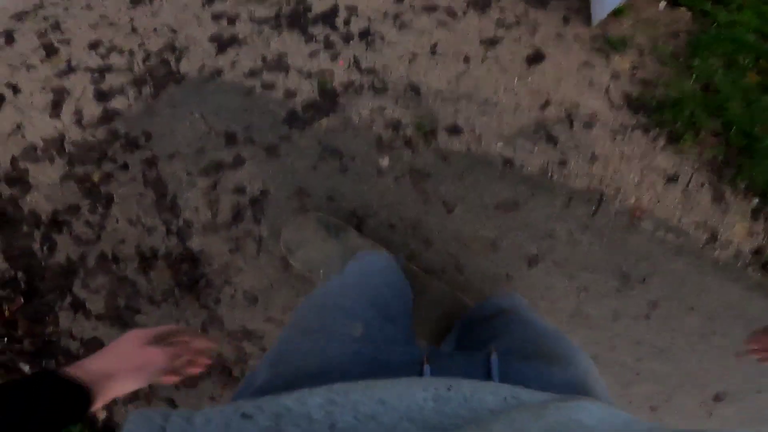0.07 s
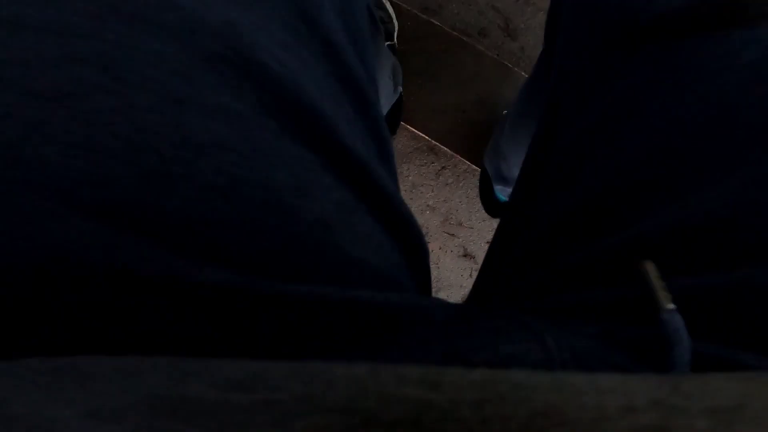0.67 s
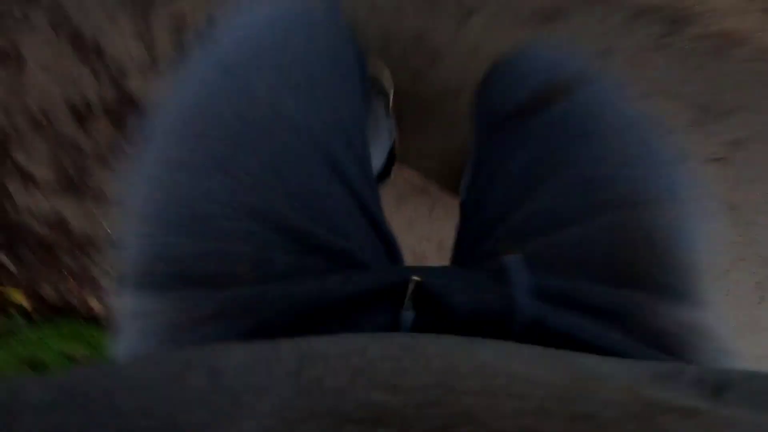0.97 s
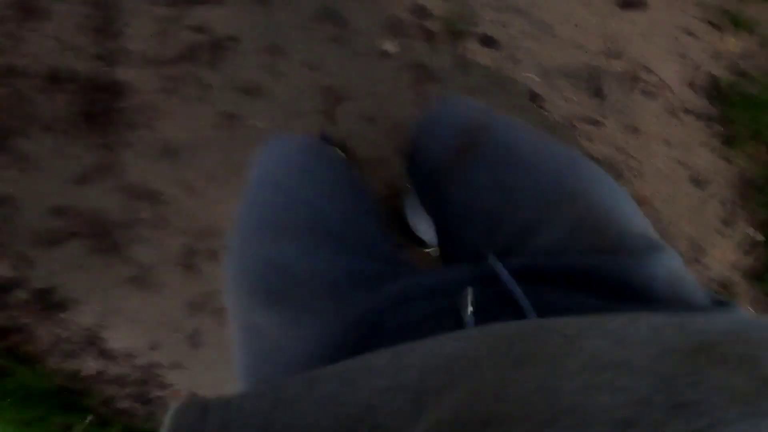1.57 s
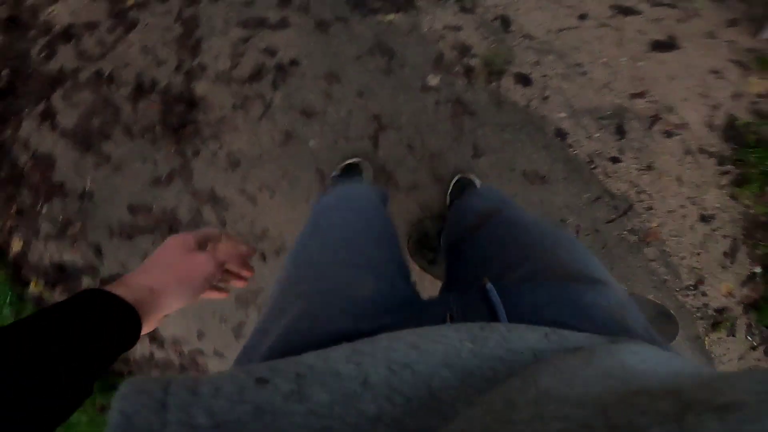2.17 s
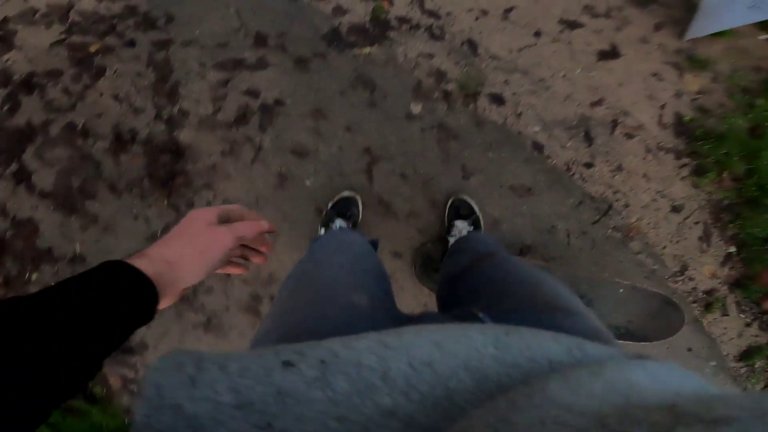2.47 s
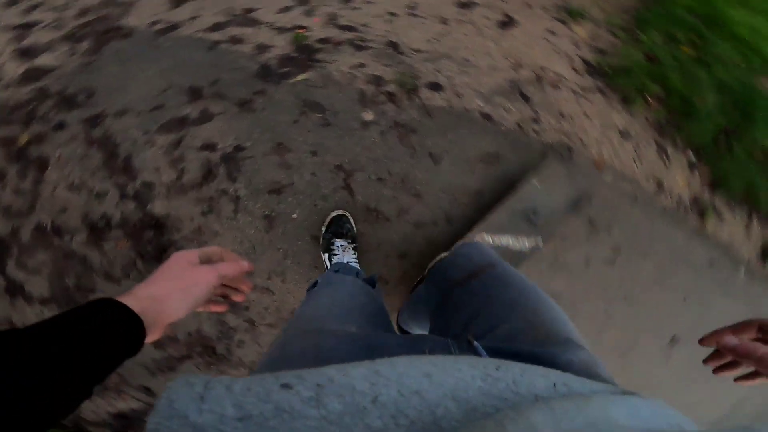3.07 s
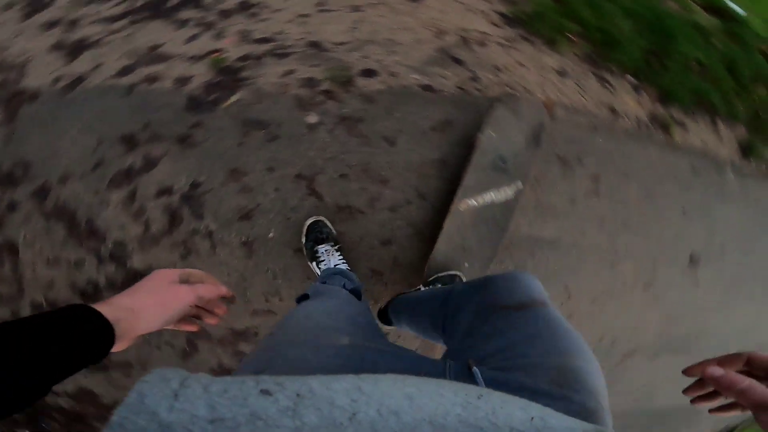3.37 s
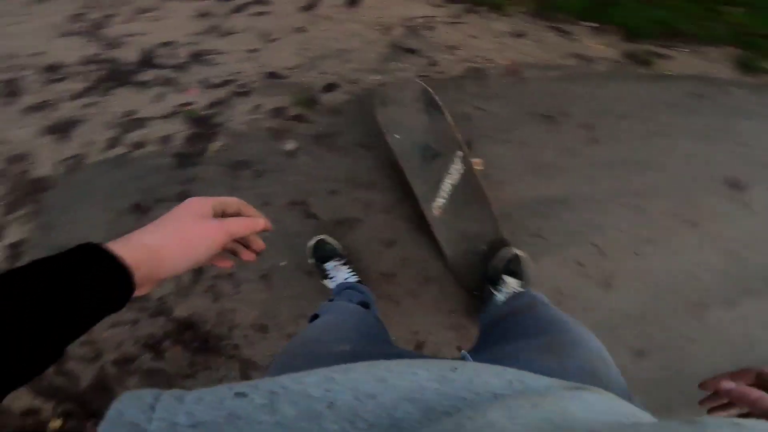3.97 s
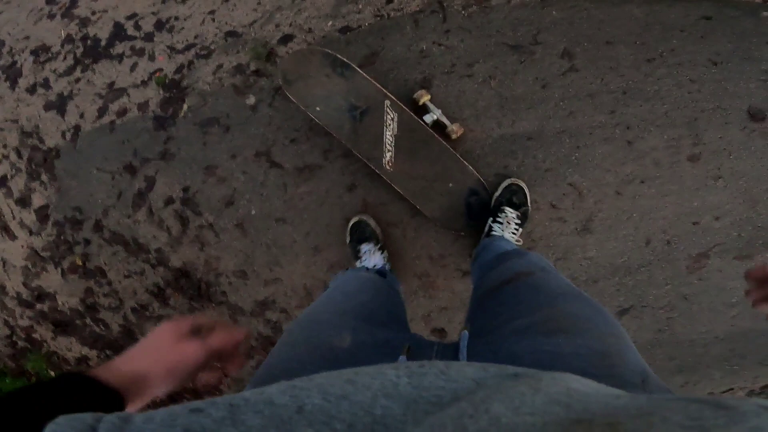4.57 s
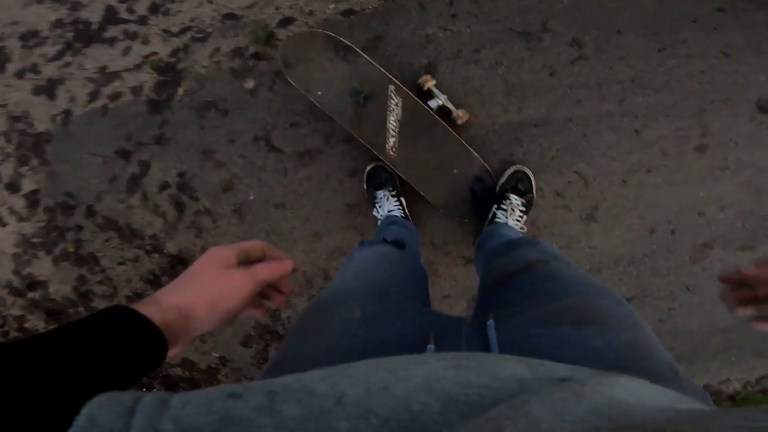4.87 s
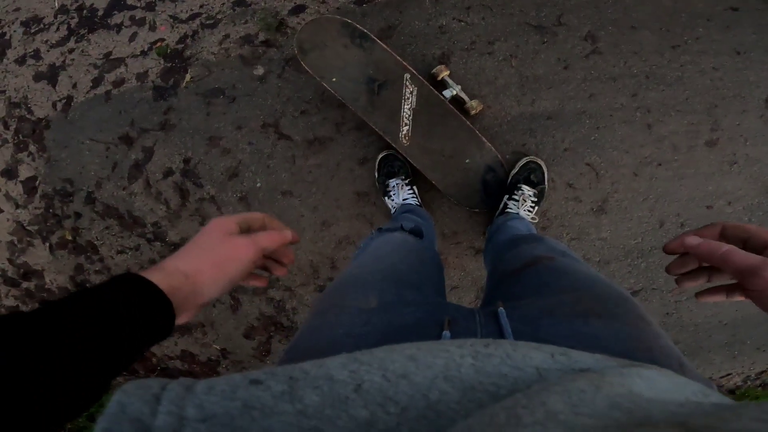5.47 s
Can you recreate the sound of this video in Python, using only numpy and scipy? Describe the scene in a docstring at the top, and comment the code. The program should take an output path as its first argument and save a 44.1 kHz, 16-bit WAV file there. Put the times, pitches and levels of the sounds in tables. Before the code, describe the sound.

Low wind rumbles on a chest-worn microphone throughout, over faint distant traffic and a light hiss. In the first second, soles scuff softly and grit snaps on a concrete path, while stronger gusts swell from about 0.5 to 0.9 seconds. At 1.2 seconds a skateboard's tail pops and a shoe drags over the grip tape. The board lands in a close wooden clatter, loudest around 1.5 seconds and dying away by 1.8. The wheels whirr softly from about 2.2 to 2.6 seconds, rising slightly in pitch. From 2.8 seconds a foot flips the board and shoves it around, making an uneven run of ringing wooden knocks, gritty scrapes and rattling trucks. This gets busier from 3.6 seconds and ends near 4.4. One faint scuff follows at about 4.8 seconds, then only wind and far traffic remain until 5.5 seconds.

```python
"""A concrete path outdoors, the microphone on a skateboarder's chest, the board at their feet.
Wind rumbles on the microphone throughout, over far traffic and faint microphone hiss. Soles scuff and
grit snaps; at 1.2 s the tail pops, a shoe drags over the grip tape, and the board lands and clatters,
its maple deck ringing. The wheels whirr briefly as it rolls. From 2.8 s a foot flips the board and
shoves it round, knocking and scraping, the trucks now free to rattle."""
import sys
import numpy as np
from scipy import signal
from scipy.fft import rfft, irfft
from scipy.io import wavfile
from scipy.ndimage import uniform_filter1d

SR = 44100
rng = np.random.default_rng(int(sys.argv[2]) if len(sys.argv) > 2 else 0)


def transcribe(u):
    """Save the signal u as a 16-bit wav file named by the first command-line argument.

    u: samples, shape (n,) or (channels, n), limited to [-1, 1]; the rate is SR.
    q: integer samples, one column per channel.
    """
    v = np.clip(np.atleast_2d(u).T, -1, 1)
    q = np.round(v * 32767).astype(np.int16)
    wavfile.write(sys.argv[1], SR, q)


N = 243152

# breeze on the microphone (time [s], level [dB])
BREEZE_LEVEL = [(0, -29), (.35, -28.5), (.9, -26.5), (1.15, -33.5), (1.6, -29.5), (2.15, -35), (2.95, -31),
                (3.45, -31), (3.8, -29), (4.1, -28), (4.4, -31.5), (4.7, -30.5), (5.5, -27.5)]
# its rumble (frequency [Hz], gain [dB])
BREEZE_COLOUR = [(12, -18.5), (25, 1.5), (40, 2), (75, 2), (120, 0.5), (190, -9.5), (260, -11),
                 (400, -20.5), (900, -67.5), (5000, -100)]
# rushes of air as the rider crouches and lands (middle [s], length [s], level [dB])
GUSTS = [(0.527, 0.16, -16.5), (0.765, 0.094, -19), (0.842, 0.08, -20.5), (1.59, 0.096, -25.5),
         (4.492, 0.05, -24.5), (4.739, 0.076, -35)]
# their deeper rumble (frequency [Hz], gain [dB])
GUST_COLOUR = [(12, -18), (25, 2), (45, 1.5), (75, 8), (120, -5), (190, -10.5), (300, -20), (500, -34),
               (900, -68), (5000, -100)]
# a far road (time [s], wash level [dB], tyre roar level [dB], roar centre [Hz])
TRAFFIC = [(0, -38, -56, 895), (.5, -40, -40, 954), (0.85, -39, -53, 991), (1.08, -34, -40.5, 1039),
           (1.6, -33, -54, 985), (1.951, -42.5, -48, 850), (2.36, -38, -44, 955), (2.58, -37, -47, 929),
           (3.101, -36, -37, 949), (4.698, -35, -42, 935.6), (5.5, -31.5, -35.5, 911.5)]
# its broad wash (frequency [Hz], gain [dB])
TRAFFIC_COLOUR = [(100, -4), (200, 2.5), (330, -10.5), (550, -0.5), (800, -0.5), (1000, -0.5), (1350, -6.5),
                  (2000, -13), (3000, -31), (4600, -63), (6000, -49.5), (15000, -80)]
# faint, steady microphone hiss (time [s], level [dB])
HISS_LEVEL = [(0, -54.5), (1.1, -50), (1.9, -52), (2.6, -49), (4.4, -52.5), (5.5, -52)]
# its spectrum (frequency [Hz], gain [dB])
HISS_COLOUR = [(1000, -1.5), (2400, 2), (3200, -1), (4700, -9.5), (5300, -23.5), (10000, -29.5),
               (12000, -41.5), (15000, -50.5)]
# slides and rolls of sole and board (start [s], end [s], pressure [dB], grittiness [dB])
SLIDES = [(0.005, 1.1, -46.5, 12), (0.186, 0.343, -41.5, 12.5), (0.407, 0.43, -29, 3),
          (0.446, 0.56, -58, 25.5), (0.589, 0.629, -38, 8), (0.778, 0.87, -36.5, 2),
          (1.086, 1.18, -43, 12.5), (1.158, 1.24, -31.5, 12), (1.231, 1.31, -25.5, 9),
          (1.334, 1.36, -27, 5.5), (1.382, 1.513, -26.5, 4.5), (1.553, 1.75, -41.5, 11),
          (2.583, 2.805, -58, 19), (2.786, 2.869, -32, 3.5), (2.862, 2.957, -35, 8), (2.96, 3.064, -50, 13),
          (3.164, 3.225, -24.5, -2), (3.25, 3.32, -30, -1.5), (3.35, 3.412, -32.5, -6),
          (3.425, 3.492, -31.5, 1.5), (3.61, 3.744, -24, 2.5), (3.781, 3.838, -26, 0),
          (3.886, 3.93, -26, -6), (3.929, 3.982, -20.5, -5.5), (4.015, 4.113, -24, -3),
          (4.14, 4.223, -22, -2.5), (4.251, 4.404, -37, 6.5), (4.752, 4.795, -30.5, -12)]
# ringing of the maple deck and its trucks (frequency [Hz], level [dB], t60 [s])
DECK_MODES = [(450, -17.5, 0.065), (498.3, 6, 0.044), (574, 7, 0.093), (615.4, 5.5, 0.26),
              (680.2, 5.5, 0.1), (770.4, 3.5, 0.13), (849.4, 4.5, 0.074), (1482, 0.5, 0.057),
              (1800, -1, 0.071)]
# higher wood and truck resonances that sing and rattle (frequency [Hz], level [dB], t60 [s])
RATTLE_MODES = [(1389, 11, 0.029), (1660, 9.5, 0.021), (1654, 4, 0.044), (1811, 1.5, 0.053),
                (2170, -14.5, 0.018), (2296, -11, 0.075), (3170, -18, 0.022), (4060, -5, 0.0059),
                (4220, -10, 0.023)]
# how freely those sing; the feet mute them until the board is loose (time [s], gain [dB])
RATTLE_FREEDOM = [(1.5, -25), (2.8, 8), (4.2, 3.5)]
# the deck flexing in a slide (frequency [Hz], gain [dB])
FLEX_COLOUR = [(130, -22.5), (220, -12), (290, -4), (400, 3), (500, -10), (900, -38.5), (6000, -70)]
# wood rasping on concrete (frequency [Hz], gain [dB])
RASP_COLOUR = [(500, -60.5), (1100, 9.5), (1450, 2), (1900, 0), (2500, 2), (3100, -8), (4300, -20),
               (5300, -36), (9000, -45), (15000, -46.5)]
# crushed grit (frequency [Hz], gain [dB])
GRIT_COLOUR = [(1500, -16), (3000, 13.5), (4500, 13), (5400, 2), (7500, -1.5), (10000, -3), (12500, -12.5),
               (15000, -14.5)]
# soles, wheels and the deck's edge catching as they twist
# (time [s], length [s], level [dB], first pitch [Hz], last pitch [Hz], bandwidth [Hz])
SCUFFS = [(0.203, 0.0059, -37.5, 4270, 4050, 450), (0.206, 0.052, -45, 3410, 3650, 1600),
          (0.214, 0.011, -39, 2890, 3100, 350), (1.104, 0.072, -46.5, 3480, 3530, 900),
          (1.285, 0.019, -30, 1664, 1640, 120), (1.701, 0.0076, -19, 1190, 1305, 250),
          (3.655, 0.049, -39.5, 4200, 4150, 700), (3.949, 0.023, -42, 1486, 1480, 253),
          (4.014, 0.0397, -29, 1550, 1440, 220), (4.037, 0.067, -50, 4250, 4150, 500),
          (4.069, 0.043, -37, 1434, 1540, 220), (4.205, 0.04, -29.5, 1425, 1415, 200),
          (4.26, 0.017, -37, 3520, 3480, 900)]
# the largest grains snapping under wood or sole (time [s], level [dB], centre [Hz], t60 [s])
GRIT_TICKS = [(0.2615, -48, 11900, .045), (0.3055, -34.5, 3800, 0.027), (0.505, -38, 5450, 0.028),
              (0.799, -42.5, 5400, .035), (1.1775, -46, 6000, .03), (1.266, -41, 9000, 0.11),
              (1.3132, -28, 7500, .009), (1.3452, -35, 8500, 0.02), (1.3906, -38, 10500, .07),
              (1.432, -42, 9000, .04), (1.444, -39, 7500, .045), (1.4717, -37, 7000, 0.073),
              (1.6165, -46, 7500, 0.014), (1.648, -43, 7500, .035), (1.698, -50, 9000, .03),
              (1.772, -47, 7400, .015), (3.1741, -37, 6560, 0.052), (3.2608, -43, 5400, .035),
              (3.357, -54, 10000, .06), (3.452, -48, 7500, 0.054), (3.622, -36, 5400, .02),
              (3.644, -41, 7500, .04), (3.674, -42, 7540, .045), (3.7365, -46, 7500, 0.023),
              (4.0225, -36, 4500, 0.028), (4.157, -44, 5400, .04), (4.2046, -42, 7000, .03),
              (4.3435, -40, 7500, 0.05), (4.3648, -37.5, 7540, 0.052), (4.3885, -35, 4200, 0.045),
              (4.859, -40, 4200, .025)]
# blows on the board (time [s], strength [dB], weight [0 bare tap to 1 full stamp], crack [dB],
# bending pitch [Hz], ring centre [Hz], crack centre [Hz], clack [dB], t60 under sole or ground [s])
KNOCKS = [(0.423, -22.5, 0.098, -12, 323, 720, 1500, -2, 0.23),
          (1.1905, -10, 0.16, -11, 263, 715, 2000, 0, 0.39), (1.228, -20, .17, -7, 346, 710, 2600, 3, .1),
          (1.2439, -8, .53, -14, 313, 670, 2000, 1, .35),
          (1.252, -15.5, 0.27, -12.5, 347, 734, 3770, -4.5, .3),
          (1.26, -13.5, 0.56, -8, 334, 654, 3500, 9, .3), (1.268, -14, 0.86, -1, 293, 704, 3800, 3, .3),
          (1.298, -15, 0.36, -1, 252, 686, 1700, 8, 0.22), (1.337, -27, .1, -2, 330, 620, 1700, 0, .1),
          (1.383, -22.5, 0.12, -7, 330, 760, 2100, -2, 0.17),
          (1.401, -17.5, 0.83, -10, 303, 650, 2000, 3, .15),
          (1.422, -15, 0.64, -16, 308, 650, 2000, 3, .15), (1.433, -25, .1, -8, 330, 620, 1500, 1, .1),
          (1.4453, -23, .1, -6, 330, 620, 1400, 1, .15), (1.47, -15, 0.15, -11, 336, 680, 2480, -3, 0.14),
          (1.4838, -1.5, 0.26, -12.5, 295, 674, 2700, 4.5, 0.089),
          (1.4915, -6.5, 0.14, -12, 254, 600, 2340, -9, .3),
          (1.507, -12.5, .11, -30, 300, 700, 2980, 0, 0.092),
          (1.5145, -3.5, 0.42, -14, 255, 530, 1500, 11.5, 0.053),
          (1.532, -11.5, 0.39, -5, 306, 682, 2570, 9.5, 0.078),
          (1.542, -31, 0.34, -8, 313, 623, 1810, 1, 0.11), (1.565, -21, 0.56, 1, 300, 600, 1680, 0, .1),
          (1.5865, -13, 0.085, -16, 385, 740, 1720, 8.5, 0.068),
          (1.593, -11.5, 0.78, -27, 315, 600, 1500, 1, 0.085), (1.612, -31, .13, 1, 320, 960, 2430, 7, .08),
          (1.6392, -9, 0.46, -23, 308, 790, 1500, 5, 0.25),
          (1.6485, -22.5, 0.64, -18, 328, 780, 1700, 0, .2),
          (1.6745, -14, 0.44, -9.5, 353, 760, 2200, 3, .44),
          (1.705, -20.5, 0.38, 1, 308, 740, 2100, -7, 0.36),
          (1.743, -23.5, 0.092, -5, 313, 800, 1700, 1, 0.41),
          (1.79, -26.5, 0.4, -3, 282, 780, 1780, 9, 0.36),
          (2.7627, -11.5, 0.49, -14, 424, 740, 1600, 5.5, .12),
          (2.775, -14, 0.38, -17, 290, 560, 1510, -4, 0.14),
          (2.781, -18.5, .32, -15, 340, 705, 1712, 1, 0.13), (2.809, -12.5, .4, -20, 275, 560, 1700, 3, .2),
          (2.819, -14.5, 0.2, -17, 275, 800, 1650, -4, 0.33),
          (2.8728, -15.5, .14, -13, 410, 770, 1630, 1, .4),
          (2.889, -16.5, .25, -5, 382, 800, 1690, -1, 0.36),
          (2.912, -19.5, .11, -12, 387, 669, 1430, -1, .3),
          (2.9515, -18.5, 0.12, -10, 367, 830, 1300, -6, 0.26),
          (3.174, -13, 0.085, -15.5, 348.6, 620, 2200, 2, 0.47),
          (3.187, -15.5, .1, -13, 401, 613, 1500, -3, .35), (3.2598, -14, .08, -13, 379, 610, 2980, 0, 0.5),
          (3.366, -27, .1, -26, 380, 620, 3000, -1, 0.99), (3.441, -19, 0.22, -15, 396, 624, 3007, -1, .15),
          (3.4485, -12.5, 0.23, -10.5, 412, 755, 3250, 0, 0.3),
          (3.605, -16.5, .2, -8, 440, 718, 1400, 9.5, 0.065),
          (3.614, -16, 0.26, -7, 374, 620, 2870, 0, 0.15),
          (3.621, -20.5, .22, -11, 380, 644, 3870, 1, 0.11), (3.637, -22, .09, -1, 382, 600, 1720, 1, .08),
          (3.646, -12.5, 0.2, -10, 298, 624, 2340, 4, .1),
          (3.658, -10.5, 0.35, -6, 370, 600, 1700, 0, 0.19),
          (3.6764, -15.5, .036, -5, 367, 640, 2770, 1, .15),
          (3.6985, -14.5, 0.17, -3.5, 317, 595, 2000, 3, 0.16),
          (3.706, -17.5, .06, -12, 340, 610, 1700, 3, .4), (3.724, -22, 0.052, 4, 345.6, 645, 2140, 3, .15),
          (3.736, -23, .083, 2, 360, 604, 1900, 2, .15),
          (3.801, -19, 0.17, -15.5, 368, 620, 2400, -7, 0.33),
          (3.837, -29.5, .1, -0.5, 360, 620, 2280, 0, 0.13),
          (3.93, -14, 0.35, -13, 420, 593, 2560, 2.5, 0.082),
          (3.9545, -18.5, .11, -6, 382, 593, 3200, 2, .06),
          (3.9677, -11.5, 0.24, -22, 290, 560, 1500, 7, .04),
          (4.009, -15, .093, -14, 350, 600, 3280, 4, .05),
          (4.0225, -11, 0.25, -16, 356, 560, 1500, -5, 0.036),
          (4.054, -11, .28, -27, 338, 565, 1500, 10.5, 0.049),
          (4.075, -19.5, 0.097, -13, 358, 578, 1550, 7, 0.091), (4.092, -25, .1, -6, 360, 950, 1400, 3, .1),
          (4.113, -20, .1, -12, 360, 587, 2440, 5, .2), (4.159, -13.5, 0.29, -25, 338, 600, 2000, -7, 0.26),
          (4.178, -15.5, 0.12, -22, 406.3, 765, 1710, 3, .2),
          (4.184, -11, 0.1, -19, 446, 583, 2001, 2, 0.14), (4.2028, -9, .1, -18, 322.7, 616, 3070, 1, 0.16),
          (4.224, -16.5, .13, -21, 374, 620, 1450, -2, .3),
          (4.2665, -14.5, 0.22, -11.5, 379, 615, 3430, 2, .2),
          (4.282, -19, 0.047, -15, 405, 610, 3600, 2, .15), (4.34, -20, .22, -11, 338, 623, 3430, -8, 0.34),
          (4.365, -22, .1, -7, 363, 620, 3600, 4, .3)]
# wood cracking on concrete (frequency [Hz], gain [dB])
CRACK_COLOUR = [(600, -28.5), (1100, 9.5), (1600, 11.5), (2000, 7), (2500, 1), (3200, -1.5), (4400, -3),
                (5300, -28.5), (9000, -14.5), (15000, -36.5)]
# what the deck gives to the air: little bass from so small a board, little treble from so soft
# a contact (frequency [Hz], gain [dB])
DECK_RADIATION = [(60, -36.5), (150, -7), (250, 0.5), (900, 2), (2000, -12.5), (4200, -18), (5500, -38),
                  (15000, -49)]
# wheels of the rolling board (time [s], level [dB], pitch [Hz])
WHEEL_WHIRR = [(2.05, -70, 900), (2.22, -42.5, 930), (2.35, -36.5, 950), (2.44, -39, 1070),
               (2.5, -50, 1150), (2.555, -37, 1190), (2.63, -69, 1200)]
# scatter from ground and nearby walls (frequency [Hz], gain [dB])
SCATTER_COLOUR = [(200, 1.5), (1500, 1.5), (5000, -3.5), (12000, -10.5)]


def undb(db):
    """Decibels to gain."""
    return 10 ** (np.asarray(db) / 20)


def unit(x):
    """Scale to rms 1."""
    return x / np.sqrt(np.mean(x ** 2) + 1e-18)


def even(x, seconds):
    """Hold a noise near rms 1 over spans longer than this."""
    return x / np.sqrt(uniform_filter1d(x ** 2, int(seconds * SR)) + 1e-12)


def curves(rows):
    """Join timed rows by straight lines: one curve for each column after the time."""
    times, *columns = np.transpose(rows)
    return np.squeeze([np.interp(np.arange(N) / SR, times, column) for column in columns])


def add(track, time, sound):
    """Mix a sound into a track at a time in seconds."""
    start = int(time * SR)
    track[start:start + len(sound)] += sound[:N - start]


def fade(t, t60):
    """Exponential decay, 60 dB down after t60."""
    return np.exp(-np.log(1000) * t / t60)


def colour(x, points, size=8192):
    """Causal filter through (frequency [Hz], gain [dB]) points, built from its cepstrum."""
    hz, db = np.transpose(points)
    grid = np.maximum(np.arange(size // 2 + 1) * SR / size, 1)
    cepstrum = irfft(np.log(undb(np.interp(np.log(grid), np.log(hz), db))))
    cepstrum[1:size // 2] *= 2
    cepstrum[size // 2 + 1:] = 0
    impulse = irfft(np.exp(rfft(cepstrum)))[:size // 2]
    return signal.fftconvolve(x, impulse)[:len(x)]


def noise(points, samples=N):
    """Noise of a given colour."""
    return colour(rng.standard_normal(samples), points)


def favour(table, hz, db_per_octave):
    """A gain in dB for each row of a table, falling away on both sides of one pitch."""
    return -db_per_octave * np.abs(np.log2(np.transpose(table)[0] / hz))


def focused_noise(points, centre_hz, samples, db_per_octave):
    """Coloured noise at rms 1, weighted towards one pitch."""
    hz, db = np.transpose(points)
    return unit(noise(np.column_stack([hz, db + favour(points, centre_hz, db_per_octave)]), samples))


def narrow_noise(hz, width_hz):
    """Noise in a narrow band around a moving centre."""
    lowpass = signal.butter(3, width_hz / 2, fs=SR, output="sos")
    slow = signal.sosfilt(lowpass, rng.standard_normal((2, len(hz) + SR // 20)))[:, -len(hz):]
    phase = 2 * np.pi * np.cumsum(hz) / SR
    return unit(slow[0] * np.cos(phase) + slow[1] * np.sin(phase))


def wander(per_s):
    """Smooth random drift at rms 1."""
    hold = int(SR / per_s)
    steps = rng.standard_normal(N // 100)[np.arange(N) // hold]
    return unit(uniform_filter1d(uniform_filter1d(steps, hold), hold))


def grains(per_s, spread_db):
    """Random clicks, a few much larger than the rest."""
    sizes = undb(spread_db * np.minimum(rng.exponential(size=N), 4))
    return unit((rng.random(N) < per_s / SR) * rng.choice([-1, 1], N) * sizes)


def mode_rings(modes, t, detune=1):
    """Each mode as a fading sine, one row a mode."""
    hz, db, t60 = np.transpose(modes)[:, :, None]
    return undb(db) * np.sin(2 * np.pi * hz * detune * t) * fade(t, t60)


def wind(buffet_db=3.5):
    """Eddies buffet the microphone in a steady breeze; deeper gusts swell and sink on top."""
    t, gust_power = np.arange(N) / SR, np.zeros(N)
    breeze = even(noise(BREEZE_COLOUR), 0.033)
    breeze *= undb(curves(BREEZE_LEVEL) + buffet_db * np.tanh(wander(per_s=16)))
    for middle, length, db in GUSTS:
        swell = np.cos(np.pi * np.clip((t - middle) / length, -0.5, 0.5))
        gust_power += (undb(db) * swell) ** 2
    return breeze + even(noise(GUST_COLOUR), 0.071) * np.sqrt(gust_power)


def traffic(waver_db=1):
    """A far road: a broad wash, and a band of tyre roar that drifts in pitch as cars go by."""
    wash_db, roar_db, roar_hz = curves(TRAFFIC)
    wash = unit(noise(TRAFFIC_COLOUR)) * undb(wash_db + waver_db * wander(per_s=11))
    roar = narrow_noise(roar_hz, width_hz=230) * undb(roar_db + waver_db * wander(per_s=9.5))
    return wash + roar


def mic_hiss():
    """Faint, steady microphone hiss behind everything."""
    return unit(noise(HISS_COLOUR)) * undb(curves(HISS_LEVEL))


def slide_levels(attack_s=0.017, sag_db_per_s=6, release_t60=0.22, rasp_db=-9, hiss_db=-26):
    """Rumble, rasp and hiss envelopes: a slide bites, loses pressure as it slows and dies away."""
    power = np.zeros((3, N))
    for start, end, pressure_db, grit_db in SLIDES:
        age = np.arange(0, end - start + release_t60, 1 / SR)
        contact = np.minimum(age / attack_s, 1) * undb(pressure_db - sag_db_per_s * age)
        contact *= fade(np.maximum(start + age - end, 0), release_t60)
        # grit adds hiss, and a share of that to the rasp
        for track, db in zip(power, [0, rasp_db + 0.18 * grit_db, hiss_db + grit_db]):
            add(track, start, (undb(db) * contact) ** 2)
    return np.sqrt(power)


def shake(force, modes):
    """Drive a set of modes with a force; neighbours swing in opposite directions."""
    response = (-1) ** np.arange(len(modes)) @ mode_rings(modes, np.arange(SR // 4) / SR)
    return unit(signal.fftconvolve(force, response)[:N])


def grit_crunch(dust_db=-3):
    """Chips of grit snap, each size pinging at its own pitch, over the hiss of fine dust."""
    chips, t = np.zeros(N), np.arange(SR // 40) / SR
    for hz in np.geomspace(2600, 13500, 14):
        ping = np.sin(2 * np.pi * hz * rng.uniform(0.95, 1.05) * t) * fade(t, t60=0.007)
        chips += np.sqrt(hz) * unit(signal.fftconvolve(grains(per_s=520, spread_db=3.5), ping)[:N])
    return unit(colour(chips, GRIT_COLOUR)) + undb(dust_db) * unit(noise(GRIT_COLOUR))


def scrapes(flex_db=-4, judder_db=3):
    """Slides catch and slip on the grain of the concrete; the tiny blows shake the deck, rasp and hiss."""
    catches = grains(per_s=800, spread_db=2.5)
    flexing = unit(colour(grains(per_s=790, spread_db=4), FLEX_COLOUR))
    rumble = even(shake(catches, DECK_MODES) + undb(flex_db) * flexing, 0.027)
    singing = undb(curves(RATTLE_FREEDOM)) * shake(catches, RATTLE_MODES)
    stick_slip = undb(judder_db * wander(per_s=110))
    rasp = even((singing + unit(colour(catches, RASP_COLOUR))) * stick_slip, 0.22)
    hiss = even(grit_crunch(), 0.09)
    return (slide_levels() * [rumble, rasp, hiss]).sum(axis=0)


def scuffs():
    """A sole, wheel or edge skids a little, with a short chirp that glides."""
    track = np.zeros(N)
    for time, length, db, from_hz, to_hz, width_hz in SCUFFS:
        swell = signal.windows.tukey(int(length * SR))
        chirp = narrow_noise(np.linspace(from_hz, to_hz, len(swell)), width_hz)
        add(track, time, undb(db) * swell * chirp)
    return track


def grit_ticks(trim_db=-0.5, attack_s=0.0011):
    """Single grains burst with a short, bright crackle, each at its own pitch."""
    track, t = np.zeros(N), np.arange(SR // 16) / SR
    for time, db, centre_hz, t60 in GRIT_TICKS:
        burst = focused_noise(GRIT_COLOUR, centre_hz, len(t), db_per_octave=7)
        add(track, time, undb(db + trim_db) * burst * np.minimum(t / attack_s, 1) * fade(t, t60))
    return track


def strike(modes, centre_hz, t, db_per_octave, detune_spread):
    """The place of a blow decides which modes ring most, and which way each swings."""
    shares = undb(favour(modes, centre_hz, db_per_octave)) * rng.choice([-1, 1], len(modes))
    return shares @ mode_rings(modes, t, 1 + detune_spread * rng.standard_normal((len(modes), 1)))


def contact_crack(t, centre_hz, freedom_db, snap_db=6, crumble_db=-12, truck_db=-5, attack_s=0.00053):
    """Hard contact snaps on the concrete, crumbles briefly and rattles the trucks."""
    snap = focused_noise(CRACK_COLOUR, centre_hz, len(t), db_per_octave=11)
    snap *= np.minimum(t / attack_s, 1) * (fade(t, t60=0.0067) + undb(crumble_db) * fade(t, t60=0.08))
    rattle = strike(RATTLE_MODES, centre_hz, t, db_per_octave=11, detune_spread=0.022)
    rattle *= 1 - fade(t, t60=0.036)  # builds just behind the snap
    return undb(snap_db) * snap + undb(truck_db + freedom_db) * rattle


def knocks(thud_db=7, ring_db=2, bend_t60=0.077, choke_s=0.055, lag_s=0.001716):
    """The weight of a blow bends and twists the deck; its bare tap rings, clacks and cracks."""
    deck, cracks, t = np.zeros(N), np.zeros(N), np.arange(SR // 4) / SR
    for time, strength_db, weight, crack_db, bend_hz, ring_hz, crack_hz, clack_db, damping_t60 in KNOCKS:
        push, tap = undb(strength_db) * weight, undb(strength_db) * (1 - weight)
        bend, twist = (bend_hz, 0, bend_t60), (bend_hz * 1.07, -8, bend_t60 / 2)
        thud = mode_rings([bend, twist], t).sum(axis=0)
        ring = unit(strike(DECK_MODES, ring_hz, t, db_per_octave=14, detune_spread=0.019))
        ring *= np.std(thud) * fade(t, damping_t60)
        # sole or ground closes on the deck and chokes the bending
        thud *= np.exp(-(t / choke_s) ** 2)
        # the struck spot moves first, and the ring follows in the same direction
        clack = np.sin(2 * np.pi * ring_hz * t) * fade(t, t60=0.01)
        ring *= np.sign(ring @ clack)
        wood = undb(ring_db) * ring + undb(clack_db) * clack
        add(deck, time + lag_s, push * undb(thud_db) * thud + tap * wood)
        freedom_db = np.interp(time, *np.transpose(RATTLE_FREEDOM))
        add(cracks, time + lag_s, tap * undb(crack_db) * contact_crack(t, crack_hz, freedom_db))
    return colour(deck, DECK_RADIATION) + cracks


def wheel_whirr():
    """The free wheels sing softly, rising in pitch as the board rolls off."""
    db, hz = curves(WHEEL_WHIRR)
    return even(narrow_noise(hz, width_hz=190), 0.026) * undb(db)


def outdoors(direct, wet_db=-19, t60=0.83, attack_s=0.0022):
    """Ground and nearby walls scatter a faint, dull tail back to the microphone."""
    t = np.arange(SR // 2) / SR
    tail = noise(SCATTER_COLOUR, len(t)) * fade(t, t60) * np.minimum(t / attack_s, 1)
    tail /= np.linalg.norm(tail)
    return direct + undb(wet_db) * signal.fftconvolve(direct, tail)[:N]


def scene():
    """In mono from chest height: the board close below, wind on the microphone, the road far off."""
    board = knocks() + scrapes() + scuffs() + grit_ticks() + wheel_whirr()
    return (outdoors(board) + wind() + traffic() + mic_hiss())[None]


def record(dry, top_hz=14700):
    """The chest-worn camera rounds the loudest peaks and cuts the top."""
    rounded = 1.042 * np.tanh(dry / 1.386)
    return signal.sosfilt(signal.ellip(8, 0.2, 70, top_hz, fs=SR, output="sos"), rounded)


dry = scene()
out = record(dry)
transcribe(out)
```